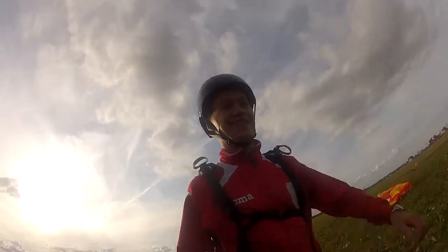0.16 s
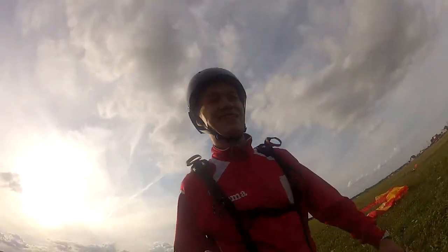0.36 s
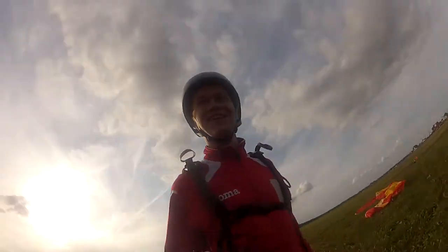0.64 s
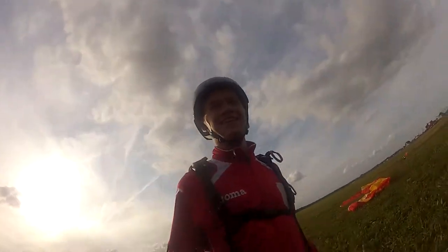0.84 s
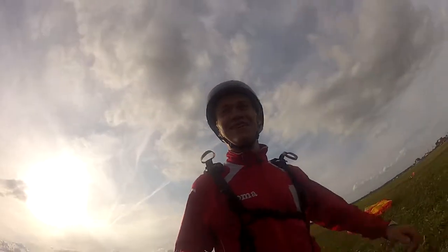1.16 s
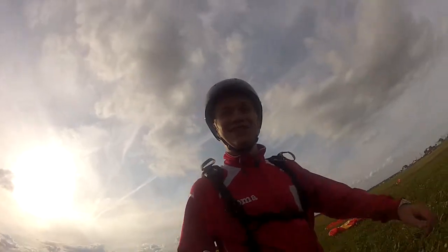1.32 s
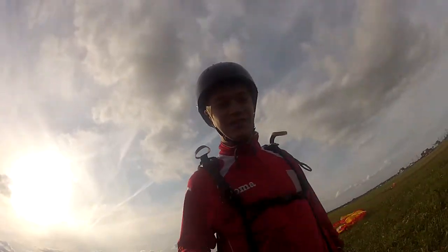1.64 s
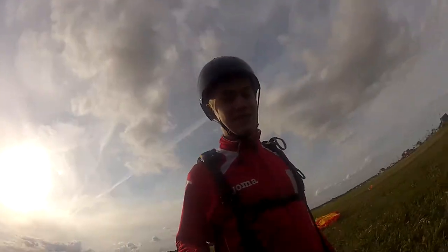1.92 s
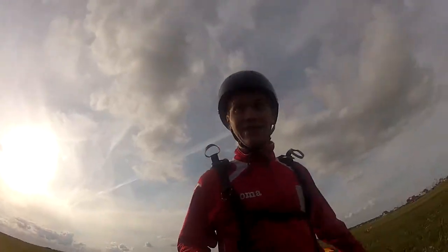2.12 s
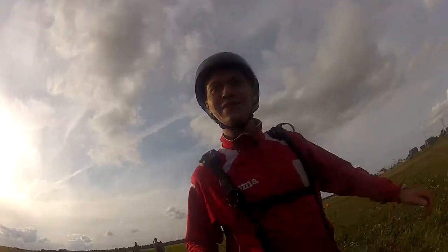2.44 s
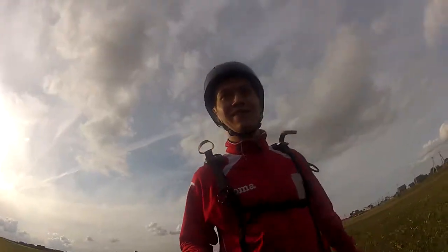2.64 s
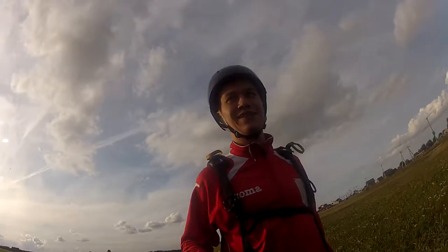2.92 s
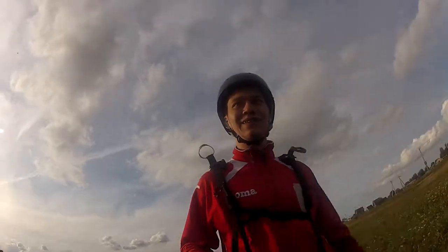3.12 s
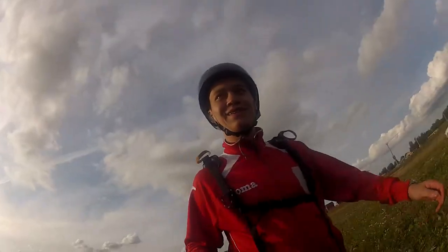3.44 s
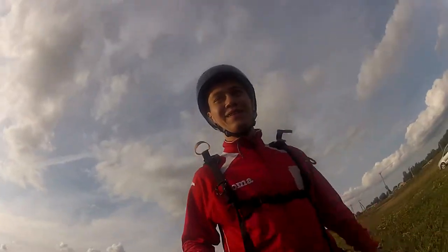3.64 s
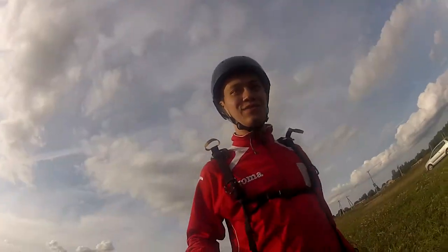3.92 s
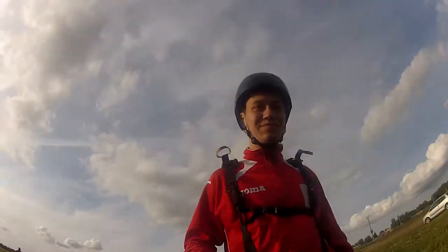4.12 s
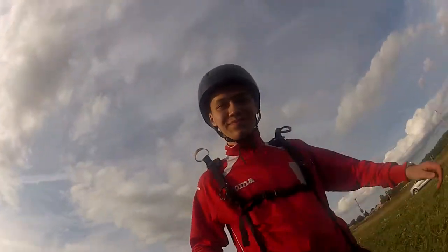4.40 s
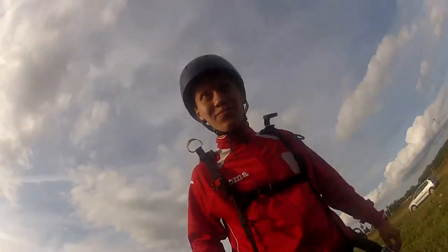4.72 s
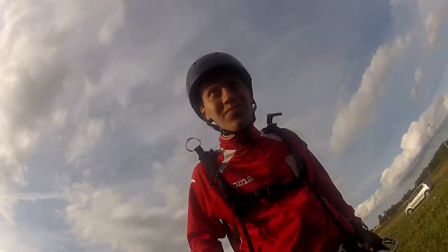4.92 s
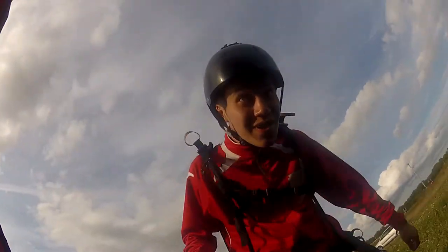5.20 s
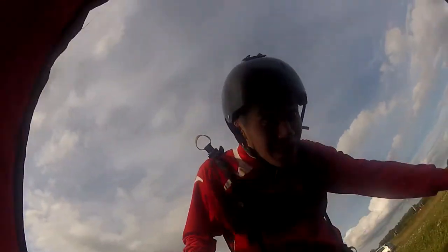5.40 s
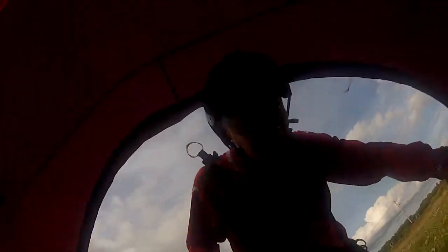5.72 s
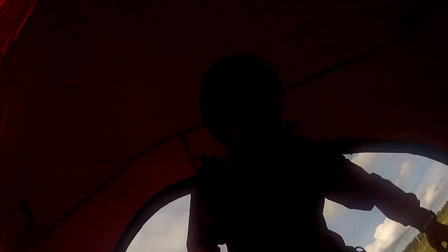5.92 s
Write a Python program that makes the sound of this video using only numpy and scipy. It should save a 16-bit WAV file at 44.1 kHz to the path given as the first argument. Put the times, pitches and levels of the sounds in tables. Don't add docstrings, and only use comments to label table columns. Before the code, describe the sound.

Someone walks across an open field, each step a boxy low knock on the microphone, between them crisp fabric rustle, small snaps and gritty hiss.

```python
import sys
import numpy as np
from scipy import signal
from scipy.io import wavfile
from scipy.ndimage import uniform_filter1d

SR = 44100
rng = np.random.default_rng(int(sys.argv[2]) if len(sys.argv) > 2 else 0)


def level_to_linear(level):
    exponent = np.asarray(level, float) / 20
    return 10 ** exponent


def persist_wave(psi):
    counts = np.round(np.clip(psi, -1, 1) * 32767).astype(np.int16)
    wavfile.write(sys.argv[1], SR, np.atleast_2d(counts).T)


N = 266981
LEAD_S = 0.005


def evened(x):
    return x / np.sqrt(np.mean(x ** 2) + 1e-20)


def noise_for(t):
    return rng.standard_normal(len(t))


def wander(t, size):
    return evened(uniform_filter1d(noise_for(t), size=size))


def band(x, hz, width_hz, order=1):
    edges = np.clip([hz - width_hz / 2, hz + width_hz / 2], 20, SR / 2 - 20)
    return signal.sosfilt(signal.butter(order, edges, "bandpass", fs=SR, output="sos"), x)


def ring(modes, t, detune=1):
    return sum(level_to_linear(db - 60 * t / t60) * np.sin(2 * np.pi * hz * detune * t) for hz, db, t60 in modes)


def sealed(x):
    seal = signal.butter(5, 756, fs=SR, output="sos")
    thin = signal.butter(1, 60, "highpass", fs=SR, output="sos")
    return signal.sosfiltfilt(thin, signal.sosfiltfilt(seal, x, padlen=0), padlen=0)


def spectrum_db(points, hz):
    f, value = np.transpose(points)
    return np.interp(np.log(hz + 1), np.log(f + 1), value, left=-80, right=-80)


def texture(source, spectrum, level_db, patchy_db, flicker_db, size=512):
    hz, t, z = signal.stft(source, SR, nperseg=size, noverlap=size * 3 // 4)
    patches = rng.standard_normal((len(t), len(hz))).T
    patches = uniform_filter1d(patches, size=6, axis=0)
    patches = evened(uniform_filter1d(patches, size=10, axis=1))
    flicker = wander(t, 3)
    z = z * level_to_linear(spectrum_db(spectrum, hz)[:, None] + patchy_db * patches + flicker_db * flicker)
    rms = np.sqrt(2 * np.mean(np.sum(abs(z) ** 2, 0)))
    z = z / rms * level_to_linear(level_db(hz[:, None], t))
    return signal.istft(z, SR, nperseg=size, noverlap=size * 3 // 4)[1][:N]


# deepest_swing_s, peak_db, whip_back_ms, case_ring_db, shake_db
STEPS = [(0.5017, -2.5, 1.38, -16.5, -27.5), (1.024, -11.5, 1.8, -10, -19.5), (1.5775, -11, 1.8, -10, -16),
         (2.1155, -6, 1.63, -10.5, -23), (2.6268, -5.5, 1.64, -12.5, -26), (3.1409, -8, 1.94, -9.5, -17),
         (3.6606, -5.5, 1.43, -26, -21), (4.2139, -8.5, 1.8, -8, -18.5), (4.7361, -10, 2.75, -36, -18.5),
         (5.2805, -28.5, 2.5, 0, -3.5), (5.9577, -29, 2.18, -7, -17)]
# pitch_hz, level_db, t60_s
CASE_MODES = [(148, 5, 0.02), (221, 2.5, 0.035), (362, -16, 0.055), (488.4, 3.5, 0.029),
              (604.5, -11, 0.054)]


def step(db, whip_ms, ring_db, shake_db):
    t = np.arange(round(0.2 * SR)) / SR
    ms, out_ms = (t - LEAD_S) * 1000, 2.7
    start = np.clip((ms + 3.9) / 1.1, 0, 1)
    late = ms - 0.3 * whip_ms
    swing = np.exp(-(late / np.where(late < 0, 3.4, 1.25 * whip_ms)) ** 2) * start
    stiffen = (0.5 / whip_ms - 0.5 / out_ms) / (whip_ms + out_ms)
    jolt = -swing * np.cos(2 * np.pi * ms * (0.5 / whip_ms + stiffen * (ms - whip_ms)))

    push_db, push_hz, push_ms = -5.5, 142, 3.5
    push = -level_to_linear(push_db) * start * np.exp(-((ms + 1.2) / push_ms) ** 2)
    push *= np.cos(2 * np.pi * push_hz * (ms + 0.69) / 1000)

    after = np.maximum(t - LEAD_S - whip_ms * 0.0016, 0)
    case = -level_to_linear(ring_db) * ring(CASE_MODES, after, 1.78 / whip_ms)

    clumps = level_to_linear(3.1 * wander(t, 300))
    shake = evened(band(noise_for(t), 257, 320)) * clumps
    shake *= level_to_linear(shake_db - 60 * t / 0.23) * np.minimum(t / 0.012, 1)
    scuff = evened(band(noise_for(t), 990, 2000)) * level_to_linear(-33 - 60 * t / 0.05)
    scuff *= np.minimum(t / 0.00094, 1)
    return level_to_linear(db) * (1.133 * sealed(jolt + push + case + shake) + scuff)


# start_s, peak_db, centre_hz
KNOCKS = [(0.029, -29, 527), (0.532, -28.5, 286), (1.062, -31, 464), (1.082, -24.5, 254), (1.093, -27, 254),
          (1.101, -23.5, 404), (1.129, -32, 290), (1.158, -31, 244), (1.222, -31, 720), (1.609, -28, 574),
          (2.168, -26.5, 293), (2.451, -36.5, 318), (2.649, -25, 278), (2.999, -33, 750), (3.189, -34, 396),
          (3.527, -30.5, 584), (3.676, -29, 467), (3.938, -32.5, 714), (4.251, -37, 286),
          (4.465, -33.5, 577), (4.874, -36.5, 490), (4.918, -30.5, 717), (4.935, -35.5, 527),
          (5.272, -27, 350), (5.294, -31, 477), (5.348, -31.5, 400), (5.478, -35, 620), (5.627, -26, 726)]


def knock(db, hz):
    t = np.arange(round(0.06 * SR)) / SR
    t60 = 0.032
    modes = [(hz, 0, t60), (1.73 * hz, -4, t60), (0.56 * hz, -6, t60)]
    body = sealed(ring(modes, t) * np.minimum(t / 0.00091, 1))
    tick = evened(band(noise_for(t), 1300, 1100, order=2)) * level_to_linear(-17 - 60 * t / 0.012)
    return level_to_linear(db) * (body + tick)


# start_s, peak_db, centre_hz
SNAPS = [(0.0348, -26.5, 5100), (0.0812, -24.5, 4730), (0.168, -33.5, 3050), (0.228, -26, 4000),
         (0.421, -31.5, 4750), (0.4713, -33.5, 3100), (0.615, -26, 3600), (0.6647, -29.5, 3000),
         (0.7672, -49, 3080), (0.9832, -36, 3460), (1.1031, -33.5, 3180), (1.5322, -35, 2050),
         (1.6154, -32, 3450), (1.695, -32.5, 3120), (1.9343, -37, 3750), (2.2702, -45, 4740),
         (2.313, -29, 2900), (2.4172, -31, 1800), (2.4369, -33.5, 3100), (2.4523, -33, 2680),
         (3.0011, -35.5, 3270), (3.7112, -34.5, 1540), (3.811, -32.5, 3550), (3.926, -30.5, 3740),
         (4.0063, -36, 3040), (4.7465, -35, 1780), (4.8735, -34, 3000), (4.8888, -25, 3550),
         (4.9197, -23, 2920), (5.6281, -28.5, 3230)]
# start_s, peak_db, centre_hz, t60_s
CRACKLES = [(0.09, -24.5, 4870, 0.043), (0.096, -27, 4750, 0.025), (0.228, -28, 2920, 0.11),
            (0.2328, -22.5, 4060, 0.059), (2.3300, -30.5, 2880, 0.01), (2.4170, -33, 3260, 0.021),
            (2.4518, -38.5, 1390, 0.014), (4.898, -37, 3000, 0.016), (4.921, -27.5, 2930, 0.011),
            (5.6460, -43, 2590, 0.019)]


def snap(db, hz, t60=0.019):
    t = np.arange(round(0.12 * SR)) / SR
    crackle = level_to_linear(4.4 * wander(t, 40))
    noise = noise_for(t) * crackle * level_to_linear(-60 * t / max(t60, 0.004))
    noise[0] = 9.0
    body = evened(band(noise, hz, 0.45 * hz, order=2))
    body += 0.4 * evened(band(noise, 3100, 4400, order=2))
    return level_to_linear(db + 1.5) * body / abs(body).max()


def strap_tug(step_db):
    return snap(-29 + 0.45 * step_db, 2700)


# start_s, ring_db, length_s, pitch_hz, clatter_db
RATTLES = [
    (3.7113, -24.5, 0.0021, 607, -2.5),
    (4.7465, -27.5, 0.022, 598, 0),
    (5.226, -42, 0.059, 495, -20),
]
# pitch_hz, level_db, t60_s
BUCKLE_MODES = [(987, -2, 0.04), (1180, 8, 0.019), (1500, -15, 0.02), (1770, 1, 0.019), (2160, -5, 0.013)]


def rattle(db, length, hz, clatter_db):
    t = np.arange(round(0.2 * SR)) / SR
    shaking = np.exp(-(t / (1.24 * length)) ** 2)
    pumped = signal.oaconvolve(shaking, level_to_linear(-60 * t / 0.068))[:len(t)]
    unsteady = level_to_linear(1.5 * wander(t, 200))
    tone = pumped / pumped.max() * unsteady * np.sin(2 * np.pi * hz * t)
    hits = rng.random(len(t)) < 5000 / SR
    contacts = hits * noise_for(t) * np.sqrt(shaking)
    clatter = signal.oaconvolve(contacts, ring(BUCKLE_MODES, t))[:len(t)]
    clatter = evened(clatter) + 1.2 * evened(band(contacts, 1700, 1700, order=2))
    return level_to_linear(db) * (tone + level_to_linear(clatter_db) * clatter / abs(clatter).max())


# start_s, length_s, level_db, fizz_db above it, sag_db from start to end
STROKES = [(0.0, 0.15, -45, -5.5, 10), (0.145, 0.098, -47.5, -2.5, -5.5), (0.269, 0.27, -49.5, -1.5, 3),
           (0.555, 0.41, -46.5, -1, 9), (0.957, 0.31, -51, -3.5, 5), (1.217, .24, -44.5, -2.5, 3),
           (1.45, 0.12, -53.5, -13, -5.5), (1.555, 0.14, -53, -2, -2), (1.707, 0.25, -44.5, -2, 3.5),
           (2.041, 0.16, -48.5, 0.5, 8), (2.266, 0.22, -49.5, -1.5, 5), (2.564, .53, -55, -2.5, 6.5),
           (3.124, 0.11, -53.5, -4.5, 6), (3.286, 0.25, -50, -2, 13.5), (3.643, 0.091, -54.5, -7.5, 3),
           (3.772, 0.095, -53, -2, 0), (3.889, 0.12, -50, -2.5, -1.5), (4.146, 0.23, -55, -4.5, 3),
           (4.267, 0.38, -52.5, -1, 3), (4.714, 0.24, -52, -6.5, 9.5), (4.93, 0.24, -45, -2.5, 10.5),
           (5.236, 0.13, -53.5, -3, 2.5), (5.445, 0.22, -50.5, -3.5, -4), (5.67, 0.56, -51.5, -6, 19)]


def cloth_level(t):
    rise_s, fall_s = 0.031, 0.078
    slack_db, slack_fizz_db = -61.5, -6
    level, fizz = level_to_linear(slack_db) ** 2, level_to_linear(slack_db + slack_fizz_db) ** 2
    for s, length, db, fizz_db, sag_db in STROKES:
        gate = np.clip(np.minimum((t - s) / rise_s, (s + length - t) / fall_s) + 0.5, 0, 1)
        sag = sag_db * np.clip((t - s) / length, 0, 1)
        power = (gate * level_to_linear(db - sag)) ** 2
        level = level + power
        fizz = fizz + power * level_to_linear(fizz_db) ** 2
    return 10 * np.log10(level), 10 * np.log10(fizz / level)


# pitch_hz, level_db per Hz
CLOTH = [(500, -15), (850, -7.5), (1060, -16.5), (1240, -6.5), (1490, -17), (1790, -10.5), (1940, -12),
         (2940, -4.5), (4100, -7.5), (5270, -6.5), (5900, -3), (7670, -40), (13000, -120)]


def rustle():
    slips = level_to_linear(4.5 * np.minimum(rng.exponential(1, N), 3.5)) * (rng.random(N) < 1500 / SR)
    source = evened(slips * rng.standard_normal(N)) * 0.63 + rng.standard_normal(N)

    def level(hz, t):
        fizz = np.clip((hz - 3500) / 800, 0, 1)
        rub = np.clip((2200 - hz) / 500, 0, 1)
        level_db, fizz_db = cloth_level(t)
        main_db = level_db + 4.5 + fizz * (fizz_db + 1.5)
        rub_db = -65 + 0.82 * (level_db + 53) - 0.34 * fizz_db + 13
        return (1 - rub) * main_db + rub * rub_db
    return texture(source, CLOTH, level, patchy_db=1.7, flicker_db=0.5, size=256)


def ticks():
    ticks_per_s = 7
    when, size, tone = rng.random((round(ticks_per_s * N / SR), 3)).T
    s = when * N / SR
    peak_db = cloth_level(s)[0] + 13 + 3 * np.log(size)
    return np.transpose([s, peak_db, 3100 * (0.88 + 0.13 * tone)])


# pitch_hz, level_db per Hz
GRIP = [(59, -37), (100, -27), (139, -5), (236, -7.5), (286, -4.5), (426, -5.5), (575, -3.5), (661, -6),
        (720, -10.5), (1300, -48.5), (1690, -65), (2860, -120)]
# start_s, level_db
GRASP = [(0, -48.5), (1.1, -53.5), (1.9, -51), (2.9, -54), (4.6, -54), (6.05, -52)]


def grip():
    def level(hz, t):
        return np.interp(t, *np.transpose(GRASP)) + 0.31 * (cloth_level(t)[0] + 48.5) + 3.5
    return texture(rng.standard_normal(N), GRIP, level, patchy_db=-1.0, flicker_db=1.5, size=1024)


# pitch_hz, level_db per Hz
BREEZE = [(8.8, -39), (15, -8.5), (70, 2.5), (81, 12), (97, -17.5), (135, 1), (178, -31.5), (200, -1),
          (260, -29), (440, -120)]
# start_s, level_db
GUSTS = [(0, -44), (.25, -60), (.6, -52.5), (1.7, -53.5), (1.88, -53), (2.2, -53), (4.2, -55.5), (4.9, -60),
         (5.25, -53.5), (5.6, -59.5), (5.9, -50.5), (6.05, -53)]


def breeze():
    def level(hz, t):
        return np.interp(t, *np.transpose(GUSTS)) + 5.5
    return texture(rng.standard_normal(N), BREEZE, level, patchy_db=2.0, flicker_db=1.5, size=2048)


# pitch_hz, level_db per Hz
HISS = [(500, -39), (850, -1), (1030, -21), (1520, 11.5), (2940, 7), (4030, -11), (4860, 12), (5900, -73),
        (7670, -48), (13000, -120)]


def hiss():
    return texture(rng.standard_normal(N), HISS, lambda hz, t: -62.5, patchy_db=2.5, flicker_db=1)


def add(mix, s, sound):
    part = mix[round(s * SR):][:len(sound)]
    part += sound[:len(part)]


def scene():
    mix = rustle() + grip() + breeze() + hiss()
    for s, db, *row in STEPS:
        add(mix, s - LEAD_S, step(db, *row))
        add(mix, s - LEAD_S, strap_tug(db))
    players = (KNOCKS, knock), (SNAPS, snap), (CRACKLES, snap), (RATTLES, rattle), (ticks(), snap)
    for table, source in players:
        for s, *row in table:
            add(mix, s, source(*row))
    return mix[None]


def top_cut(x):
    return signal.sosfilt(signal.butter(12, 16630, fs=SR, output="sos"), x)


def record(dry):
    squeezed = 1.3 * np.tanh(dry / 1.3)
    smooth = signal.oaconvolve(squeezed, signal.firwin(101, 5654, fs=SR)[None], "same")
    slow = signal.resample_poly(smooth, 40, 147, axis=1, window=("kaiser", 8))
    held = signal.resample_poly(np.repeat(slow, 4, axis=1), 147, 160, axis=1)[:, :N]
    limit = signal.firwin(255, 15450, window=("kaiser", 7), fs=SR)
    limited = signal.oaconvolve(held, limit[None], "same")
    return top_cut(limited)


dry = scene()
out = record(dry)
persist_wave(out)
```